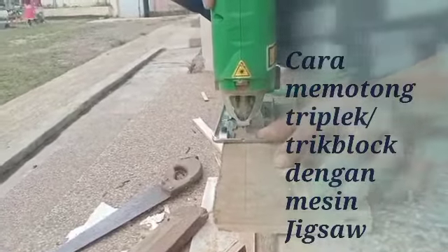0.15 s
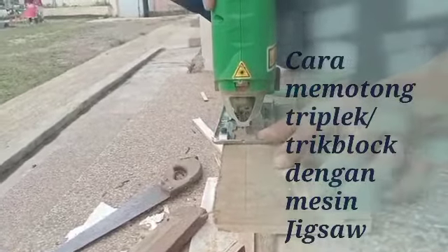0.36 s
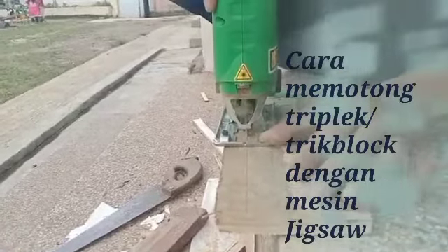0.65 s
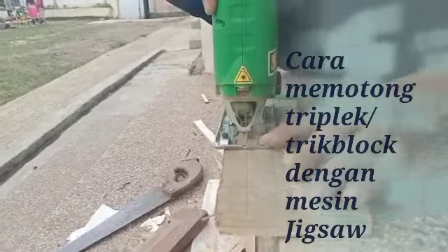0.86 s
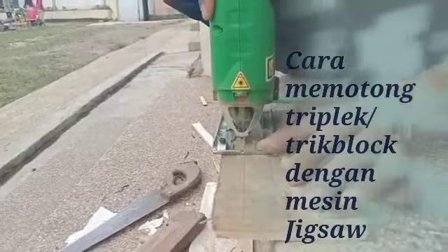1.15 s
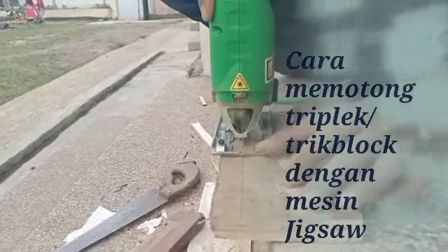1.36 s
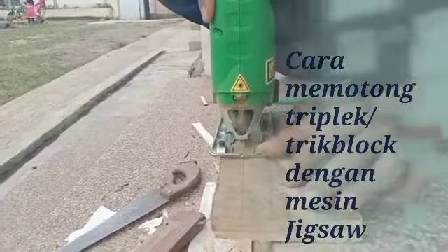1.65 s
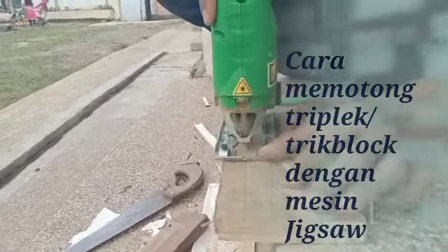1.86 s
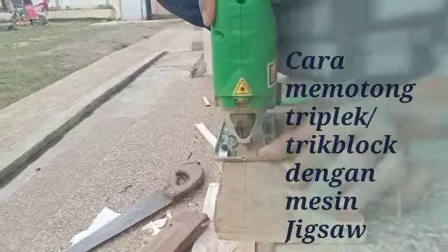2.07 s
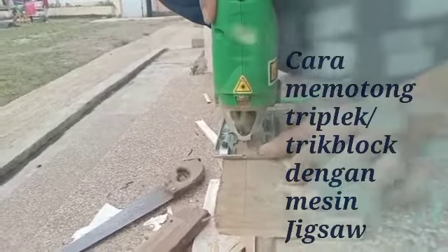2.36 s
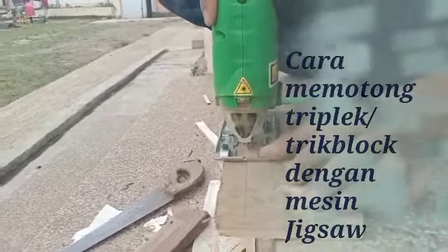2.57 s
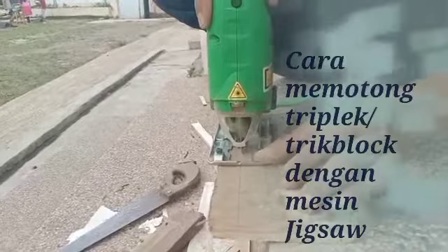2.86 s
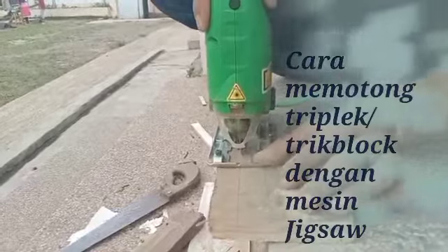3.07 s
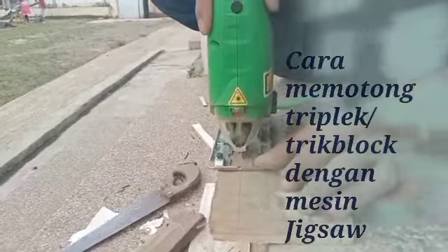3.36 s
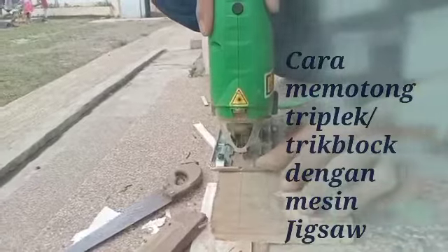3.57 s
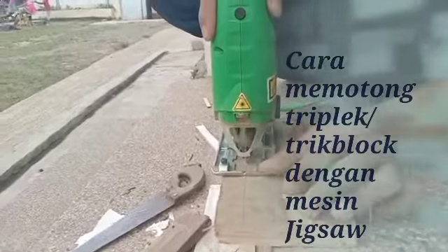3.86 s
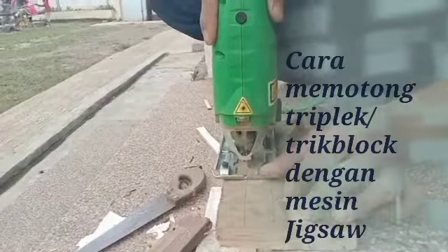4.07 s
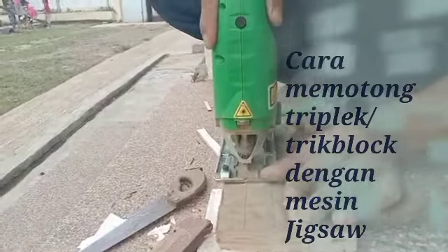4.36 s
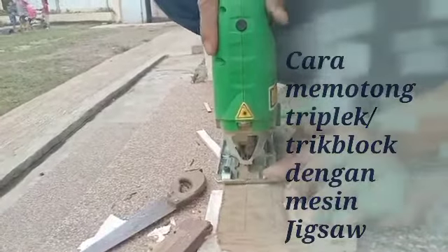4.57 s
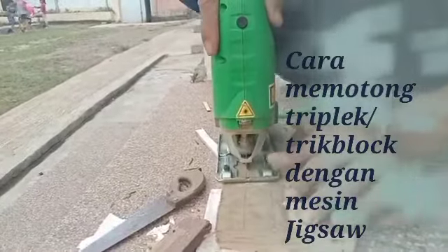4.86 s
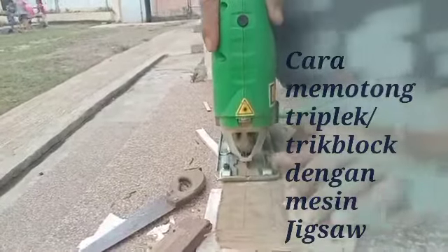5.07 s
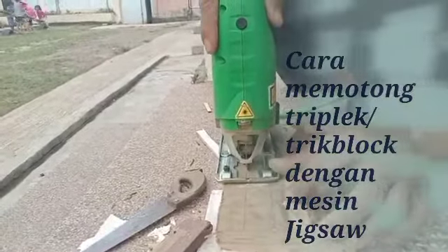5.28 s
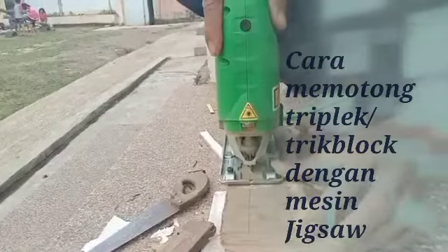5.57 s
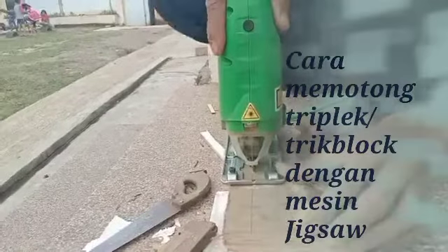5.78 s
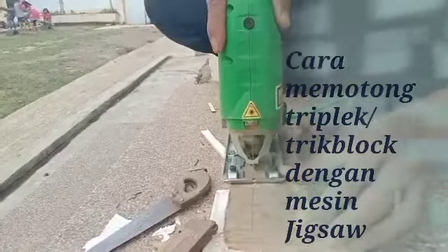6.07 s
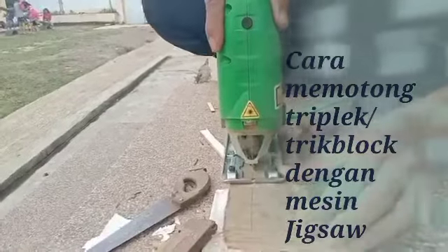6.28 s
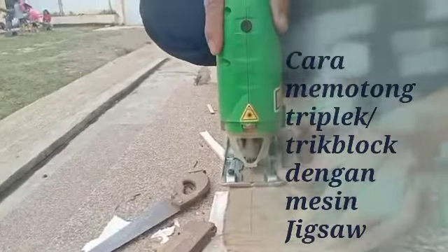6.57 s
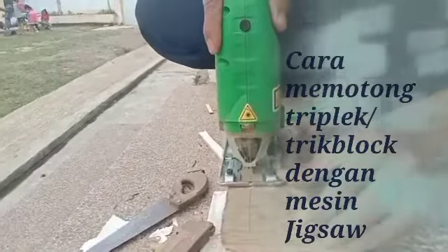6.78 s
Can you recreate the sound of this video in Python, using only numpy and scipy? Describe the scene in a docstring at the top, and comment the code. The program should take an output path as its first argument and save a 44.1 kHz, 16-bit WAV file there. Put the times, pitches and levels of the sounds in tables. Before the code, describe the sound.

A jigsaw cuts plywood close by, briefly winds down and rattles on the sheet, then spins up and cuts again.

```python
"""Jigsaw cutting plywood

A corded jigsaw cuts a plywood sheet outdoors, close by. Each blade stroke knocks the sheet twice,
exciting its damped modes, and rasps out dust, over the hum, gear whine and fan hiss of the saw.
Midway the trigger is let go: the motor coasts down, the saw rattles on the sheet, then spins up
and bites again."""
import sys
import numpy as np
from scipy.fft import rfft, irfft, next_fast_len
from scipy.io import wavfile
from scipy.ndimage import map_coordinates

SR = 44100
rng = np.random.default_rng(int(sys.argv[2]) if len(sys.argv) > 2 else 0)


def master(y):
    """Save y as 16-bit WAV."""
    cut = np.clip(np.atleast_2d(y).T, -1, 1)
    pcm = np.round(cut * 32767)  # scale
    wavfile.write(sys.argv[1], SR, pcm.astype(np.int16))


N = 305613


def motor():
    """Drag and dry friction slow the freed motor; under power, speed and bite recover exponentially."""
    # The speed held or headed for, shifting with the feed. Each row: time in seconds, strokes a second.
    driven_speed = [(0, 41.74), (.3, 41.18), (.6, 41.85), (.95, 41.4), (1.95, 41.4), (2.35, 41.76),
                    (2.75, 41.31), (3.65, 41.39), (4.15, 41.95), (4.38, 43.01), (6.0, 42.38), (6.25, 42.53),
                    (6.5, 41.69), (6.93, 42.47)]
    trigger_off_s, trigger_on_s, ease_off_s = 4.38, 5.593, .042
    coast_s, spin_up_s, release_s, grip_s = 1.81, .211, .15, .17  # time constants
    friction = .346  # as a share of the drag at full speed
    t = np.arange(N) / SR
    off = np.clip(t - trigger_off_s, 0, trigger_on_s - trigger_off_s)
    eased = np.maximum(t - trigger_off_s + ease_off_s, 0)  # the hand stops pushing first
    on = np.maximum(t - trigger_on_s, 0)
    # slack is the share of full speed lost; bite (0-1) is how hard the teeth are driven into the wood
    slack = (1 + friction) * (1 - np.exp(-off / coast_s)) * np.exp(-on / spin_up_s)
    bite = .85 * (1 - (1 - np.exp(-eased / release_s)) * np.exp(-on / grip_s))
    return curve(driven_speed) * (1 - slack), slack, bite


def chatter(turns, slack, bite):
    """Impact excitation: each stroke slaps the sheet against the shoe twice; unloaded, the shoe buzzes."""
    # Chatter follows the pressure on the shoe. Each row: time in seconds, relative level in dB.
    strength = [(0, -23.5), (.35, -20), (1.05, -24.5), (1.3, -29), (1.95, -29.5), (2.2, -23), (2.45, -28),
                (2.55, -23.5), (3.2, -22), (3.8, -18.5), (4.35, -19.5), (6.08, -16), (6.5, -20),
                (6.76, -16.5), (6.93, -22)]
    level_db = curve(strength)
    up = knocks(turns, lag=.245, scatter_db=.6, jitter_s=.00003)
    down = knocks(turns, lag=.686, scatter_db=1, jitter_s=.0001)
    return_db = -10 + .4 * (level_db - level_db.mean())
    slaps = unit(up + amp(return_db) * down)
    grip = unit(.5 + swell(turns, lag=.28, sharpness=2.4) + .48 * swell(turns, lag=.71, sharpness=.65))
    scrape_spectrum = [(700, -13), (1100, -8.5), (1500, 4.5), (1720, -1.5), (2100, -39), (2800, -18)]
    scrape = grip * noise(scrape_spectrum, grain_db=4)
    loaded = amp(level_db + 2.5 + .8 * wobble(12)) * bite ** 2.7  # slaps need a firm bite
    buzz = amp(-41 + 18.5 * slack + 2.7 * wobble(13)) * (1 - bite)
    return loaded * (slaps + amp(-8) * scrape) + buzz * scrape


def knocks(turns, lag, scatter_db, jitter_s):
    """Modal ringing: one uneven knock a stroke, lag of a cycle late; each mode swells, then decays."""
    # Modes of sheet and shoe. Each row: multiple of the main note, width in Hz, relative level in dB.
    modes = [(.78, 171, -21.5), (1.004, 225, 2.5), (1.3, 238, -14.5)]
    # The main note shifts with blade position and shoe pressure. Each row: time in seconds, pitch in Hz.
    main_note = [(0, 1365), (1, 1390), (2.3, 1393), (3, 1444), (3.7, 1377), (4.35, 1435), (5.85, 1595),
                 (6.05, 1462), (6.9, 1425)]
    t = np.arange(N) / SR
    stroke = np.floor(turns - lag).astype(int) + 1
    timing, force = rng.standard_normal((stroke[-1] + 1, 2)).T
    start = np.interp(np.arange(len(timing)) + lag - 1, turns, t) + jitter_s * timing
    age = np.maximum(t - start[stroke], 0)
    note_hz = curve(main_note)
    ring = np.zeros(N)
    for ratio, width_hz, db in modes:
        envelope = amp(db) * (width_hz * age) ** 2 * np.exp(-np.pi * width_hz * age)
        ring += envelope * np.sin(2 * np.pi * ratio * note_hz * age)
    return amp(scatter_db * force[stroke]) * ring


def cutting(turns, surge, bite, cut_s):
    """Modulated noise: teeth tear fibres on both passes; without load the fan and brushes are left."""
    # The loudness that all four noises follow. Each row: time in seconds, relative level in dB.
    effort = [(0.0, -22), (1.93, -21.5), (4.3, -22.5), (4.71, -25), (4.75, -22.5), (4.98, -26.5),
              (5.02, -23), (5.4, -23.5), (5.48, -20.5), (5.62, -21.5), (5.69, -17.5), (6.41, -20.5),
              (6.93, -20.5)]
    # Spectra of scraped sheet, teeth, fan and dust. Each row: frequency in Hz, relative density in dB.
    wood_spectrum = [(200, -17), (310, -5), (430, -4.5), (560, -4), (800, -1.5), (1100, 5.5), (1600, 4),
                     (1950, 2), (2200, -23), (3000, -42)]
    rasp_spectrum = [(1500, 0.5), (2150, -10.5), (2520, -6), (2760, 0), (3000, -3.5), (3600, -1),
                     (4200, -9), (4780, 0), (5300, -1), (5680, 2), (6200, -5), (7000, -5), (8200, -14.5),
                     (10500, -25.5)]
    fan_spectrum = [(1120, -42), (1900, -19.5), (2390, -8), (2520, -11.5), (2750, -11), (3170, -1.5),
                    (3530, -4), (3750, -11.5), (4150, -8), (4680, -9), (5290, -3.5), (6050, -5.5),
                    (9500, -26), (12400, -65), (20900, -120)]
    dust_spectrum = [(6500, 7), (8600, -19), (10000, -6), (11800, -5.5), (13000, -2.5), (14000, 1.5),
                     (15600, 0)]
    hiss_db = curve(effort) + .43 * wobble(11)
    upstroke = .6 * swell(turns, lag=.31, sharpness=1.7)
    downstroke = .51 * swell(turns, lag=.74, sharpness=1.5)
    wood = amp(hiss_db - 7 + 4 * surge - .5 * cut_s) * noise(wood_spectrum, grain_db=.5)
    rasp = amp(hiss_db + .16) * np.sqrt(bite) * noise(rasp_spectrum, grain_db=2)
    fan = amp(hiss_db - 1.2) * np.sqrt(1 - bite) * noise(fan_spectrum, grain_db=2.5)
    dust = amp(hiss_db - 11 - 4 * (1 - bite)) * noise(dust_spectrum, grain_db=2)
    return unit(1 + upstroke + downstroke) * (wood + rasp + fan + dust)


def whine(turns, surge, bite):
    """Resonance: gear teeth and commutator sing roughly, loudest where they cross the housing's peaks."""
    # Gear and motor tones. Each row: multiple of the stroke rate, driven and coasting source level in dB.
    partials = [(47, -43, -35), (92, -30.5, -50), (94, -50, -36), (230, -38, -34), (345, -42, -37),
                (471, -52, -31), (575, -50, -34), (690, -50, -33), (805, -50, -32)]
    # How well the housing radiates. Each row: frequency in Hz, gain in dB.
    housing = [(600, -14), (850, 0), (1250, 0), (1900, -6), (2500, -6), (3200, -1), (3550, 1), (3800, -9),
               (4500, -6), (5300, 3), (6100, 1), (7000, -9), (8300, -20), (15600, -22)]
    # A gear shriek under load. Each row: time in seconds, relative level in dB.
    shriek_level = [(0, -25), (.8, -25), (1.2, -26.5), (1.75, -25), (2.3, -29), (4.3, -45), (6.1, -26),
                    (6.9, -51)]
    gears = np.zeros(N)
    for order, driven_db, coasting_db in partials:
        level = bite * amp(driven_db + 5 * surge) + (1 - bite) * amp(coasting_db)
        gears += level * tone(turns, order, rough=.9, width_hz=200)
    shriek = bite * amp(curve(shriek_level)) * tone(turns, order=137, rough=.94, width_hz=230)
    return coloured(gears, housing) + shriek


def hum(turns, bite, cut_s):
    """Forced vibration: the plunger shakes housing and sheet at harmonics of the stroke rate."""
    # The plunger's hum and the drone of the sheet's free end.
    # Each row: multiple of the stroke rate, relative level in dB.
    plunger_partials = [(4, -17.5), (5, -13.5), (6, -16.5), (7, -1), (8, -5), (9, 2), (10, -2), (11, 3.5),
                        (12, -5), (16, -3.5)]
    sheet_partials = [(14, -11.5), (15, -12), (17, 1), (18, -14.5), (19, -7.5), (21, -5), (26, -1.5),
                      (27, -1), (44, -1)]
    # as the cut lengthens the hum grows and the drone fades
    plunger = amp(-35.5 + .2 * cut_s) * harmonics(turns, plunger_partials)
    drone = amp(-26 - 2.5 * cut_s) * harmonics(turns, sheet_partials)
    return bite ** 2 * (plunger + drone)


def rattle():
    """Damped impacts: the saw jolts the sheet, mostly as it slows and restarts, over a dull thudding."""
    # Shoe and blade clack on the sheet; the sheet thumps on its support.
    # Each row: start in seconds, relative level in dB.
    clack_events = [(5.0027, -13.5), (5.4121, -13), (5.4684, -7), (5.493, -9), (5.5254, -7), (5.59, -10),
                    (5.656, -7.5), (5.7004, -6.5), (5.7353, -9), (5.801, -5.5), (5.8617, -10),
                    (5.8875, -11)]
    thump_events = [(2.46, -45), (4.324, -52), (5.445, -33), (5.613, -35), (5.689, -36), (5.78, -40)]
    # Continuous thudding on the support. Each row: time in seconds, relative level in dB.
    thud_level = [(0, -53.5), (1.2, -65), (2.3, -66), (2.95, -51), (3.45, -61), (3.8, -52.5), (4.3, -58),
                  (4.5, -61.5), (6.93, -57.5)]
    # Spectra of the clacks and the low thuds. Each row: frequency in Hz, relative density in dB.
    clack_spectrum = [(150, -39), (700, -1.5), (1450, 14), (2200, -7), (3300, 13.5), (4300, -6),
                      (5700, 10.5), (9000, -15), (15000, -27)]
    thud_spectrum = [(25, -30), (60, -11.5), (100, -8), (160, 5.5), (225, -10.5), (320, 3), (430, -21)]
    clacks = amp(-4.5) * jolts(clack_events, rise_s=.00042, t60_s=.048)
    thumps = amp(-1) * jolts(thump_events, rise_s=.0065, t60_s=.34)
    thudding = amp(curve(thud_level) + .5 + 2.7 * wobble(12))
    return clacks * noise(clack_spectrum) + (thumps + thudding) * noise(thud_spectrum)


def jolts(events, rise_s, t60_s):
    """Exponential decay: an envelope that jumps up at each event and dies away."""
    t = np.arange(N) / SR
    ages = [(np.maximum(t - start_s, 0), db) for start_s, db in events]
    return sum(amp(db - 60 * age / t60_s) * (1 - np.exp(-age / rise_s)) for age, db in ages)


def harmonics(turns, partials):
    """Superposition of nearly pure partials, each wavering in level; rms 1."""
    return unit(sum(amp(db + 1.2 * wobble(3)) * tone(turns, order, rough=.091, width_hz=20)
                    for order, db in partials))


def tone(turns, order, rough, width_hz):
    """Line broadening: a stroke harmonic of rms 1, the share rough of its power smeared over width_hz."""
    smear = (wobble(width_hz) + 1j * wobble(width_hz)) / np.sqrt(2)
    spread = order ** 2 / 13  # bending waves disperse, so the partials spread over the cycle
    carrier = np.exp(2j * np.pi * (order * turns + spread))
    return unit(np.real(carrier * (np.sqrt(1 - rough) + np.sqrt(rough) * smear)))


def swell(turns, lag, sharpness):
    """Periodic envelope: one smooth bump a stroke, peaking lag of a cycle late."""
    return np.exp(sharpness * (np.cos(2 * np.pi * (turns - lag)) - 1))


def noise(spectrum, grain_db=0):
    """Coloured noise of rms 1; fast amplitude modulation by grain_db clumps it into tiny snaps."""
    clumps = np.clip(wobble(1200), -3, 3)
    return unit(coloured(rng.standard_normal(N) * amp(grain_db * clumps), spectrum))


def coloured(x, spectrum):
    """Spectral shaping by (Hz, dB) points joined on a logarithmic frequency axis."""
    points_hz, db = np.transpose(spectrum)
    return filtered(x, lambda hz: amp(np.interp(np.log(hz + 1), np.log(points_hz), db, -80, -80)))


def filtered(x, response):
    """Linear filtering: the spectrum of x times a frequency response."""
    size = next_fast_len(N + SR // 2)
    return irfft(rfft(x, size) * response(np.fft.rfftfreq(size, 1 / SR)), size)[:N]


def wobble(rate):
    """Smooth random fluctuation: a spline through rate knots a second."""
    knots = rng.standard_normal(int(N * rate / SR) + 4)
    return map_coordinates(knots, [np.arange(N) * rate / SR])


def curve(rows):
    """Linear interpolation of (seconds, value) rows at every sample."""
    return np.interp(np.arange(N) / SR, *np.transpose(rows))


def amp(db):
    """Decibels to amplitude ratio."""
    return 10 ** (np.asarray(db) / 20)


def unit(x):
    """Normalisation to rms 1."""
    return x / np.sqrt(np.mean(x ** 2) + 1e-20)


def scene():
    """Phase locking: one crank times the saw's tones and the cut; the rattle is added to them."""
    speed, slack, bite = motor()
    turns = np.cumsum(speed) / SR
    cut_s = np.cumsum(bite) / SR  # cutting time, weighted by bite
    # acceleration strains gears and blade, fully at 20 strokes per second squared
    surge = np.clip(np.gradient(speed) * SR / 20, 0, 1)
    saw = hum(turns, bite, cut_s) + whine(turns, surge, bite)
    cut = chatter(turns, slack, bite) + cutting(turns, surge, bite, cut_s)
    return (saw + cut + rattle())[None]


def record(dry):
    """Band limiting: an ideal low-pass filter removes the highest treble."""
    return filtered(dry[0], lambda hz: hz < 15600)[None]


dry = scene()
out = record(dry)
master(out)
```